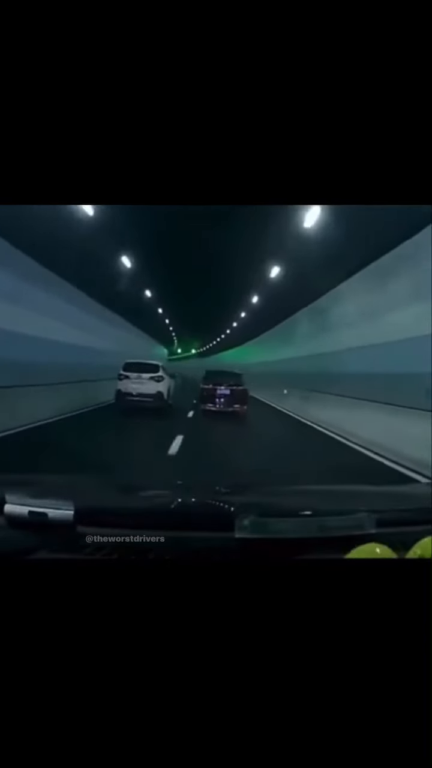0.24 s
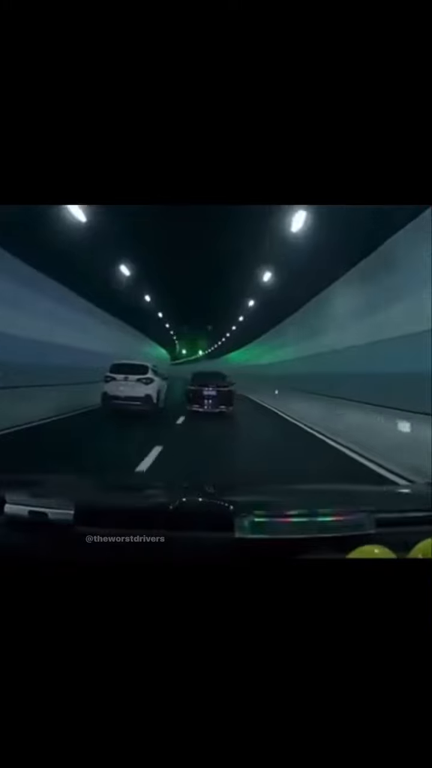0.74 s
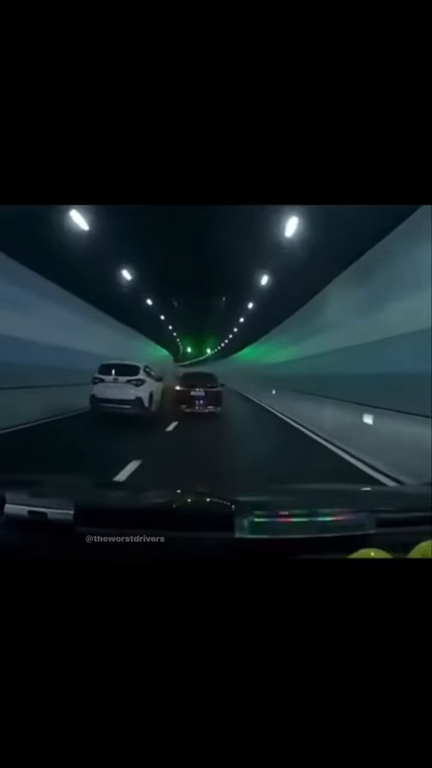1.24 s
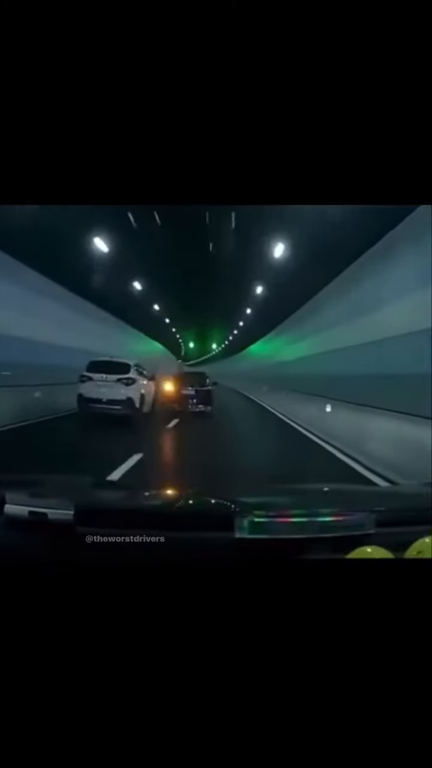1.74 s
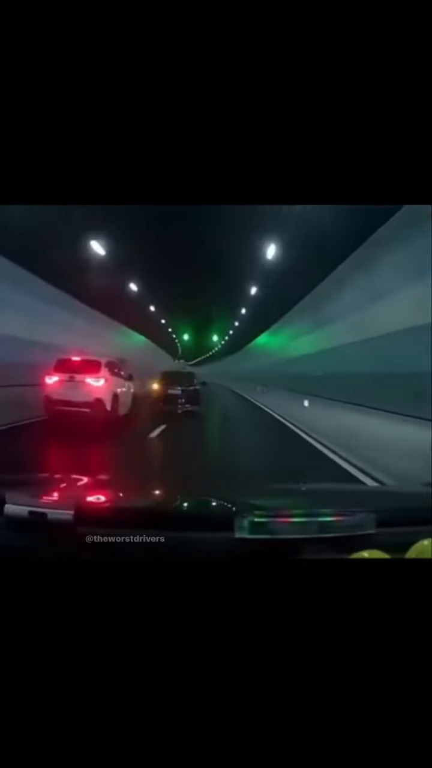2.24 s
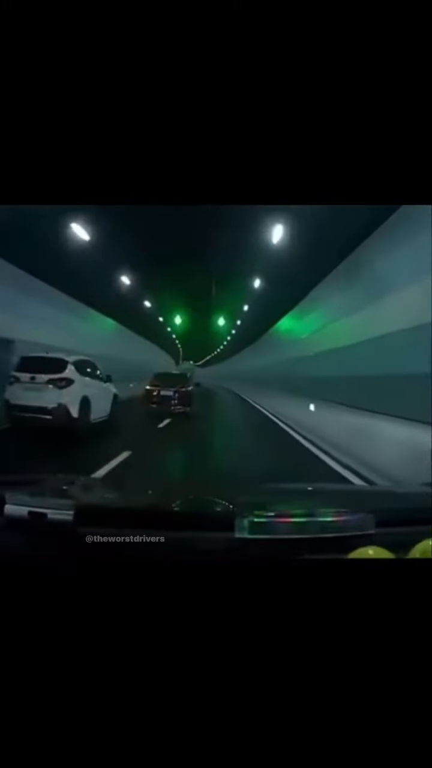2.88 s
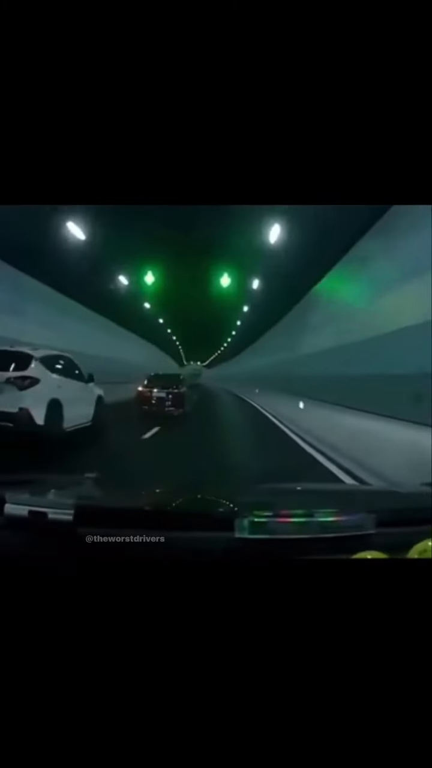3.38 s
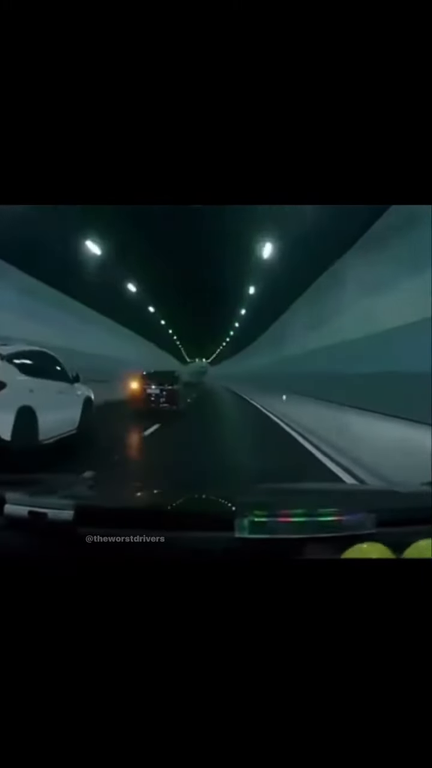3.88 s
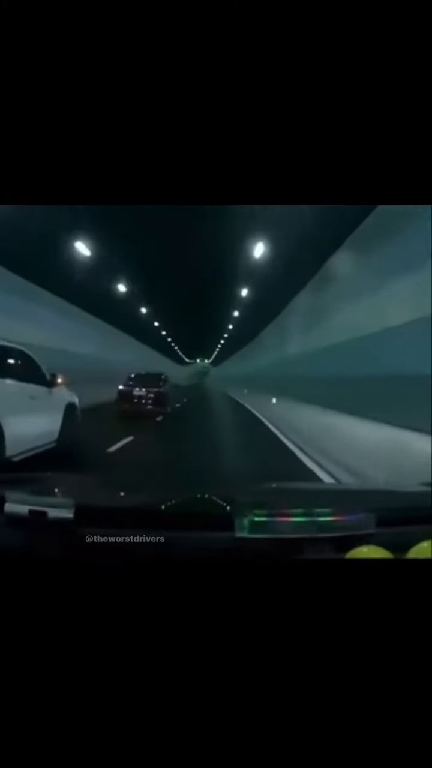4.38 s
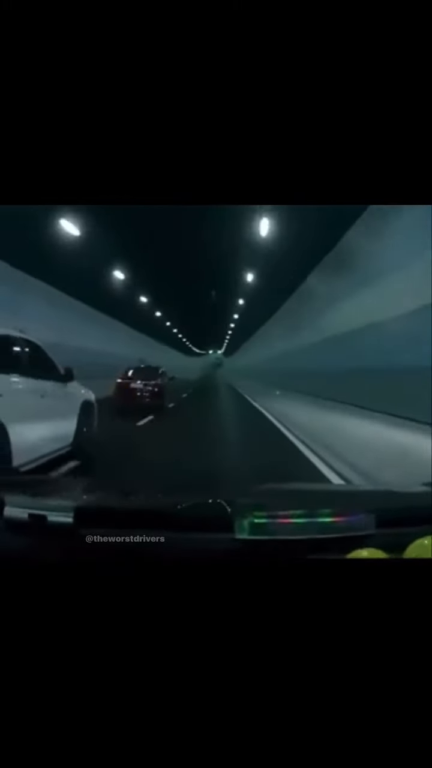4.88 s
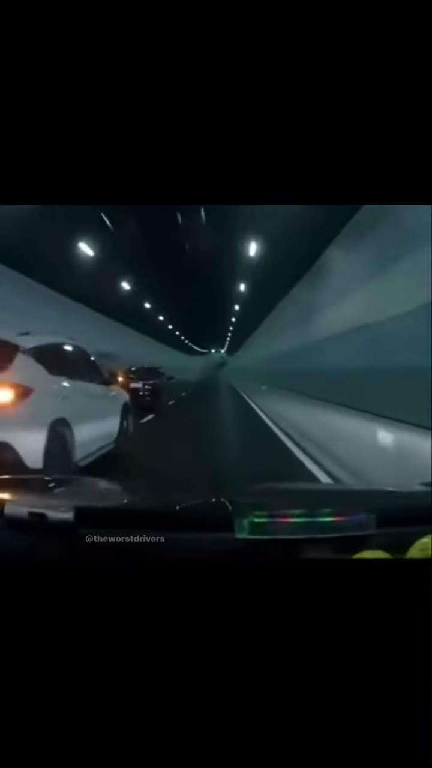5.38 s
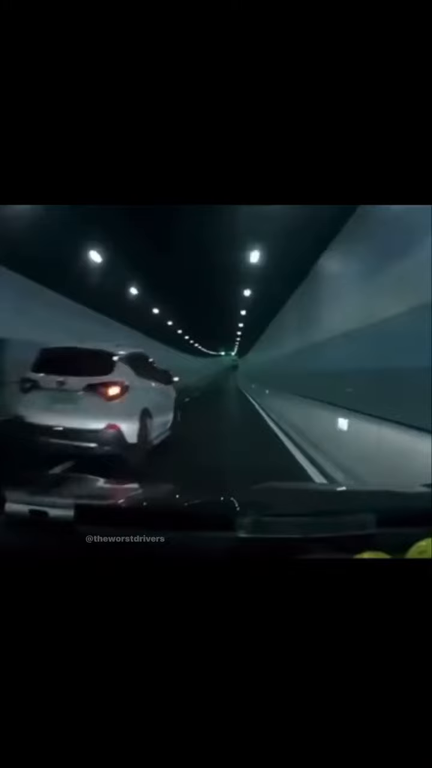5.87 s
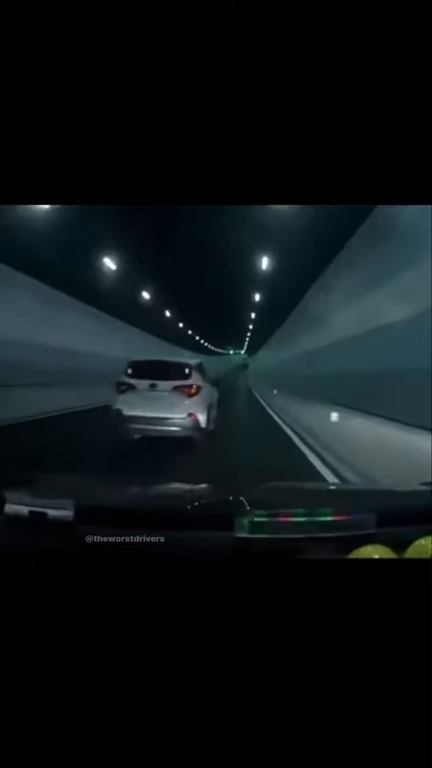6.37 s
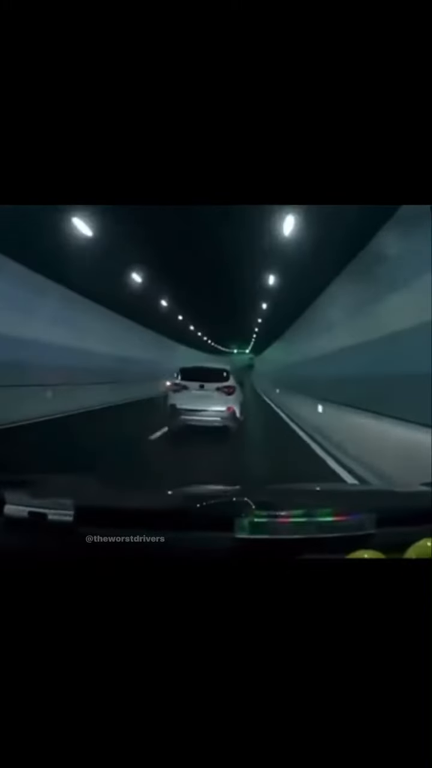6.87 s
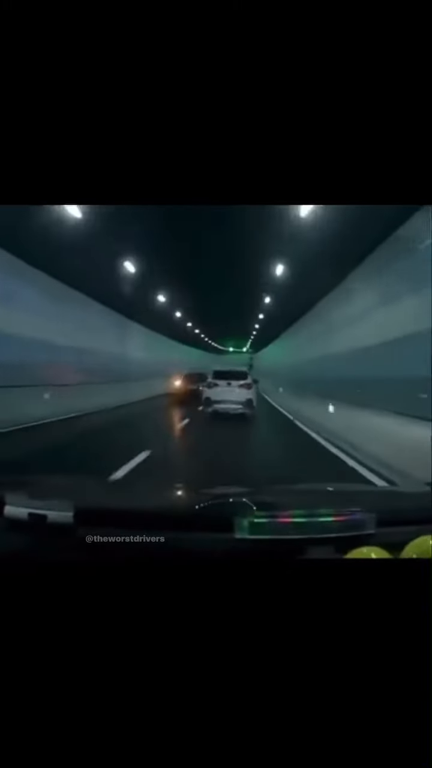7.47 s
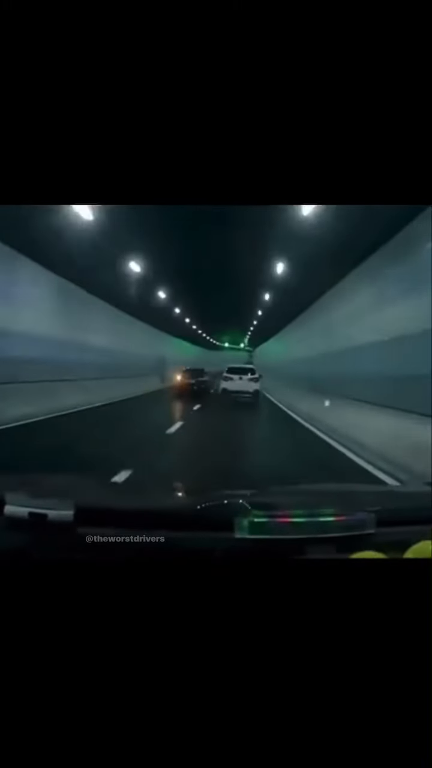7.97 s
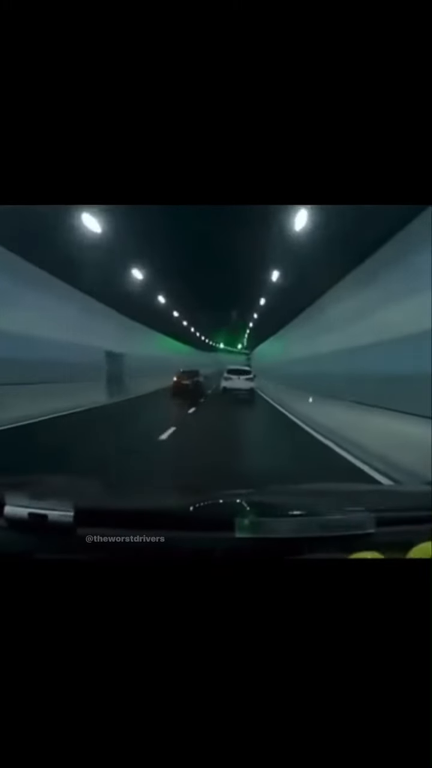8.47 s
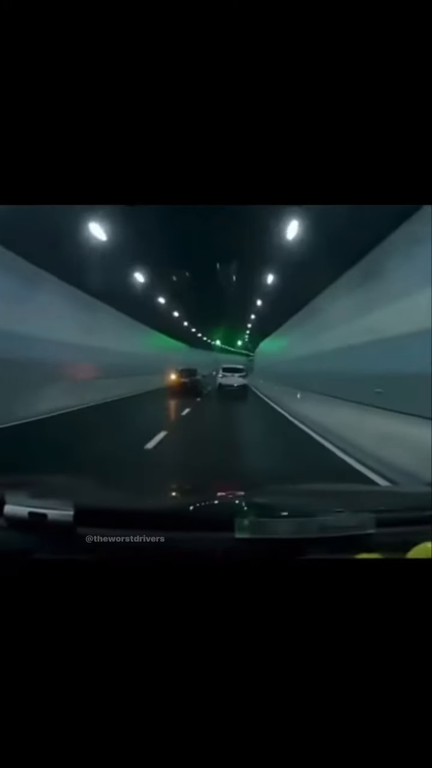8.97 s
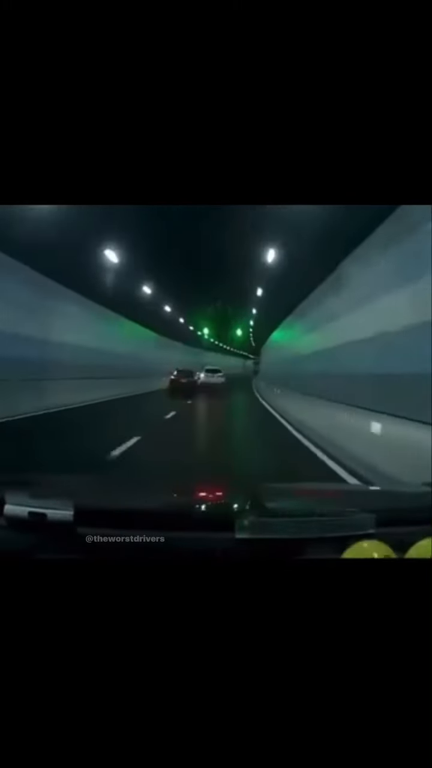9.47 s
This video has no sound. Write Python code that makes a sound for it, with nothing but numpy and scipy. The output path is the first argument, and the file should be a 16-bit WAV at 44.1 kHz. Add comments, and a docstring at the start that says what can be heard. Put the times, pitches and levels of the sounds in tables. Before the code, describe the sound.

Low, booming car cabin drone with faint air hiss, sharp plastic snap, bursts of dashboard rattling, a road-joint thump, then a momentary silence and click.

```python
"""Car cabin in a road tunnel

Heard from a camera on the windscreen: the body booms on its springs (narrow bands of low noise), the floor
drones, tyres roar through it and air hisses past the glass (flickering coloured noise). Something loose
rattles on the dashboard, plastic snaps, a metal part clinks and wheels cross road joints (struck modes).
A thin whistle (a wavering sine) sounds faintly and later climbs; near the end the sound drops out
for a moment and jumps back with a click."""
import sys
import numpy as np
from scipy import signal
from scipy.fft import rfft, irfft, next_fast_len
from scipy.io import wavfile
from scipy.ndimage import uniform_filter1d

SR = 44100
rng = np.random.default_rng(int(sys.argv[2]) if len(sys.argv) > 2 else 0)


def gain_from_decibels(decibels):
    """Convert decibel values to linear amplitude factors."""
    exponent = np.asarray(decibels, float) / 20
    return 10 ** exponent


def persist_wave(psi):
    """Save psi, clipped to +-1, as 16-bit WAV."""
    counts = np.round(np.clip(psi, -1, 1) * 32767).astype(np.int16)
    wavfile.write(sys.argv[1], SR, np.atleast_2d(counts).T)


N = 429093
T = np.arange(N) / SR

# Modes of the loose thing on the dashboard. Each row: pitch in Hz, relative level in dB,
# time in seconds for a knock's ring to fall 60 dB (the chatter rings shorter).
TRINKET_MODES = [(2070, 0, 0.015), (2520, -4, 0.028), (2900, -9, 0.0043), (3440, -0.5, 0.011),
                 (4240, 3, 0.0077), (4790, 5.5, 0.0097), (5390, 3.5, 0.013), (5860, 4.5, 0.011),
                 (6400, 2.5, 0.0088), (7000, -6.5, 0.0054), (7700, -10.5, 0.0025), (9050, -18.5, 0.0033),
                 (10300, -13, 0.004), (11700, -6.5, 0.004)]


def level(x, db):
    """Scale to an rms level."""
    return x * gain_from_decibels(db) / np.sqrt(np.mean(x ** 2))


def walk(rate):
    """Random levels held 1 / rate s and smoothed twice; spread near 1."""
    hold = int(SR / rate)
    steps = np.repeat(rng.standard_normal(N // hold + 1), hold)
    return 1.68 * uniform_filter1d(uniform_filter1d(steps, hold), hold)[:N]


def spell(start, length, edge):
    """Swell from 0 towards 1 and die away, half-way up at start and end; short spells stay below 1."""
    inside = np.minimum(T - start, start + length - T) / edge
    return np.sin(np.pi / 4 * (1 + np.clip(inside, -1, 1))) ** 2


def band_filter(x, order, edges):
    """Butterworth band-pass between two edges in Hz."""
    return signal.sosfilt(signal.butter(order, edges, "band", fs=SR, output="sos"), x)


def add(out, start, sound):
    """Mix a sound in at a time in seconds."""
    i = int(start * SR)
    out[i:i + len(sound)] += sound[:N - i]


def stream(colour, flicker_db, flicker_rate, shared_db):
    """Noise of a colour in overlapping octave bands; all waver together and each flickers alone; rms 1."""
    size = next_fast_len(N)
    octave = np.log2(np.arange(size // 2 + 1) * SR / size + 1)
    hz, db = np.transpose(colour)
    spectrum = rfft(rng.standard_normal(size)) * gain_from_decibels(np.interp(octave, np.log2(hz), db))
    shared = shared_db * walk(flicker_rate)
    out = 0
    for centre in np.arange(np.floor(np.log2(hz[0])), np.log2(hz[-1]) + 1):
        band = irfft(spectrum * np.clip(1 - abs(octave - centre), 0, 1), size)[:N]
        out = out + band * gain_from_decibels(shared + flicker_db * walk(flicker_rate))
    return level(out, 0)


def strike(modes, tilt_db, length, scatter_db, detune, push=0, soft_s=0.00051):
    """One blow: a sudden, dying burst of tiny contacts rings every mode with a new strength; peak 1."""
    hz, db, t60 = np.array(modes, float).T[:, :, None]
    t = T[:int(min(2 * t60.max() + .05, .25) * SR)]
    chance = rng.standard_normal((3, len(hz), 1))
    ring = gain_from_decibels(db + tilt_db + scatter_db * chance[0] - 60 * t / t60)
    ring = ring * (1 - np.exp(-t / soft_s)) ** 2  # the contact is soft, so the ring takes a moment to build
    ring = np.sum(ring * np.sin(2 * np.pi * hz * (1 + detune * chance[1]) * t), axis=0)
    age = T[:2048] / length
    contacts = (push + rng.standard_normal(2048)) * (1 - np.exp(-age / 0.08)) * np.exp(-age)
    out = signal.fftconvolve(ring, contacts)[:len(t)]
    return out / np.max(abs(out))


def boom():
    """Road unevenness shakes the low resonances of body and cabin; rms 1."""
    # Each row: resonance centre in Hz, width in Hz, relative level in dB.
    resonances = [(15.1, 12, -5.5), (24.97, 8, 5), (42.4, 25, -2.5)]
    out = 0
    for hz, width, db in resonances:
        band = band_filter(rng.standard_normal(N), 2, [hz - width / 2, hz + width / 2])
        out = out + level(band, db)
    # the springs bound the swing: big surges are held back, lulls filled in
    swing = np.sqrt(uniform_filter1d(out ** 2, int(.12 * SR)) + 1e-12)
    return level(out / swing ** .6, 0)


def drone():
    """The floor drones: low noise that wavers slowly."""
    # Each row: pitch in Hz, relative level in dB per Hz.
    colour = [(35, -33.5), (60, -1), (81, -10), (97, -3), (113, -1.5), (129, -0.5), (168, -9.5),
              (220, -9.5), (290, -35.5), (480, -120)]
    return stream(colour, flicker_db=0.21, flicker_rate=3.1, shared_db=0.74)


def roar():
    """Tyres roar through the floor: flickering noise, mostly low mids."""
    # Each row: pitch in Hz, relative level in dB per Hz.
    colour = [(120, -29), (200, -9.5), (241, -6), (294, -0.5), (379, -7), (463, -6.5), (624, -11),
              (1110, -16), (1210, -18), (1430, -20.5), (2800, -35.5), (3640, -59), (6160, -120)]
    return stream(colour, flicker_db=0.66, flicker_rate=12, shared_db=0.58)


def hiss():
    """Air hisses past the glass: quickly flickering treble noise."""
    # Each row: pitch in Hz, relative level in dB per Hz.
    colour = [(1530, -19.5), (2600, -3), (3620, 0.5), (4070, 2), (5030, 0.5), (7410, -14), (7870, -24.5),
              (8030, -33.5), (8760, -28.5), (11400, -73), (19300, -120)]
    return stream(colour, flicker_db=0.87, flicker_rate=18, shared_db=0.86)


def ride():
    # Each row: time in seconds, level in dB against the steady run.
    recording_level = [(0.0, -6), (.5, -5.5), (1.3, -3), (2.2, -2), (2.9, 0), (3.6, 0), (4.3, 0.5),
                       (5.3, 0), (6.3, 0), (7.6, 0.5), (9.0, 0), (9.73, 0)]
    # Uneven stretches heave the body. Each row: start in seconds, length in seconds,
    # added boom in dB, added floor drone in dB (both for a full swell).
    heaves = [(3.087, 0.12, -22, -39), (3.344, 0.04, -17.5, -35), (3.638, 0.38, -19, -41.5),
              (3.685, 0.036, -34, -34.5), (3.82, 0.19, -23, -33), (4.486, 0.073, -18, -40.5),
              (4.603, 0.033, -23, -31), (4.773, 0.027, -16.5, -31.5), (4.965, 0.14, -23, -38),
              (5.752, 0.029, -19, -52), (6.394, 0.08, -18, -38), (6.528, 0.24, -24, -46),
              (7.228, 0.32, -19.5, -41), (7.8, 0.35, -20.5, -34.5), (9.303, 0.055, -45, -44)]
    ramp_db = np.interp(T, *np.transpose(recording_level))
    heave_power, shudder_power = 0, 0
    for start, length, boom_db, drone_db in heaves:
        shape = spell(start, length, edge=0.043) ** 2
        heave_power = heave_power + gain_from_decibels(2 * boom_db) * shape
        shudder_power = shudder_power + gain_from_decibels(2 * drone_db) * shape

    def gain(steady_db, added_power):
        """Levels join as powers."""
        return np.sqrt(gain_from_decibels(2 * steady_db) + added_power)

    # the shudder reaches roar and hiss weaker than the drone
    roar_power, hiss_power = shudder_power * gain_from_decibels(2 * -2.5), shudder_power * gain_from_decibels(2 * -20.5)
    out = gain(-27.5 + ramp_db, heave_power) * boom()
    out = out + gain(-33 + ramp_db, shudder_power) * drone()
    out = out + gain(-35 + ramp_db, roar_power) * roar()
    return out + gain(-55.5 + 1.18 * ramp_db, hiss_power) * hiss()  # the ramp is steeper in the hiss


def joints():
    """Wheels hit joints in the road and the floor pan rings."""
    # Each row: time in seconds (the blow begins 3 ms earlier), peak in dB.
    blows = [(7.821, -14), (7.847, -12.5), (7.867, -18), (7.929, -18.5)]
    # Each row: mode pitch in Hz, relative level in dB, time to fall 60 dB in seconds.
    floor_pan = [(114, -33, 0.068), (178, 6.5, 0.07), (246, 8, 0.12), (306, -24, 0.045), (537, 0, 0.068),
                 (1024, -4, 0.021)]
    out = np.zeros(N)
    for s, db in blows:
        add(out, s - .003, gain_from_decibels(db) * strike(floor_pan, 0, 0.001, 1.7, 0.055, push=2.2))
    return out


def rattle():
    """Something loose knocks on the dashboard: ringing modes, a scrape while contacts last, a faint crack."""
    # Each row: time in seconds, peak of the ring in dB, brightest pitch in Hz,
    # contact length in seconds, boost of the hollow body's modes in dB.
    hits = [(0.3485, -41, 5600, 0.0018, 8), (0.4464, -43.5, 5200, 0.001, 13),
            (0.6759, -38.5, 5170, 0.0018, 14), (0.7162, -38.5, 5800, 0.0033, 11),
            (1.101, -42, 4600, 0.0046, 6), (3.7973, -38.5, 4540, 0.0044, 11), (4.255, -38, 4520, 0.0046, 2),
            (4.44, -35, 3900, 0.0037, 9), (4.606, -37, 5700, 0.0034, 10), (4.628, -27, 4970, 0.0058, -4),
            (4.645, -35, 4800, 0.0046, 0), (4.6885, -32, 5200, 0.0056, 3), (4.735, -41, 5070, 0.0028, 3),
            (4.867, -25, 5200, 0.0011, 8), (4.78, -41, 4800, 0.004, 9), (5.017, -35, 4420, 0.0059, -1),
            (5.267, -36.5, 4750, 0.0043, 4), (5.32, -40, 5720, 0.0045, -1), (5.345, -33, 6400, 0.0047, 5),
            (5.394, -33.5, 4800, 0.004, -2), (5.423, -36, 4280, 0.0045, 1.5), (5.47, -36, 4810, 0.004, 1.5),
            (5.508, -28, 6100, 0.0056, -2), (5.518, -37, 6200, 0.003, -2), (5.5535, -34, 5600, 0.0075, -4),
            (5.592, -28, 6000, 0.004, -3), (5.65, -35, 4900, 0.0054, 6), (5.673, -36, 5200, 0.0084, -2),
            (5.682, -25.5, 5400, 0.0093, -3), (5.731, -40, 4900, 0.005, -1),
            (5.753, -32.5, 4800, 0.0037, -3), (5.834, -32.5, 5000, 0.003, 4), (5.854, -31, 5900, 0.003, -1),
            (5.9105, -28.5, 5900, 0.0022, 0), (5.919, -33, 5000, 0.011, -2), (5.935, -37, 4900, 0.002, 7),
            (5.957, -33, 5060, 0.003, -1), (5.996, -34.5, 5860, 0.0025, -3), (6, -39, 5600, 0.0036, 7),
            (6.07, -40, 4260, 0.004, 5), (7.2958, -40, 6580, 0.0036, 3), (7.338, -33.5, 5800, 0.005, -3),
            (7.361, -33.5, 3830, 0.0046, 3), (7.384, -36, 5770, 0.0046, -3), (7.4, -30, 5200, 0.0047, 1),
            (7.419, -33, 5200, 0.0068, 5), (7.428, -30, 5170, 0.0092, 0), (7.475, -31.5, 6000, 0.0051, -2),
            (7.516, -34.5, 4450, 0.0044, -1), (7.554, -34, 3920, 0.003, 4), (7.559, -35, 6050, 0.0051, 5),
            (7.59, -37, 5610, 0.0037, -1), (7.61, -41, 5200, 0.003, 0), (7.633, -37, 6080, 0.0025, 1.5),
            (7.846, -37.5, 4990, 0.0023, 14), (8.079, -40.5, 3120, 0.0041, 3)]
    out = np.zeros(N)
    mode_hz = np.array(TRINKET_MODES)[:, :1]
    early_s = .0005  # ring and scrape begin this far ahead of the crack
    for s, db, bright_hz, length, body_db in hits:
        # where it lands decides which modes are favoured; those below 3600 Hz belong to the hollow body
        tilt_db = -9 * abs(np.log2(mode_hz / bright_hz)) + body_db * (mode_hz < 3600)
        add(out, s - early_s, gain_from_decibels(db) * strike(TRINKET_MODES, tilt_db, length, 1.5, .03, soft_s=.0002))
        scrape = band_filter(rng.standard_normal(1024), 2, [bright_hz / 1.3, bright_hz * 1.3])
        scrape = scrape * np.exp(-T[:1024] / length) * (1 - np.exp(-T[:1024] / .0005))
        add(out, s - early_s, gain_from_decibels(db - 4) * scrape)
        crack = rng.standard_normal(512) * np.exp(-T[:512] / 0.0009)
        add(out, s, gain_from_decibels(db - 21) * crack)
    return out


def chatter():
    """In spells the loose thing shuffles: dense tiny contacts of uneven size on its modes."""
    # Each row: start in seconds, length in seconds, level in dB.
    spells = [(3.75, 0.73, -62), (4.538, 0.28, -54), (5.284, 0.77, -52), (5.997, 0.64, -63),
              (7.294, 0.3, -50), (7.798, 0.44, -65)]
    contacts = rng.standard_normal(N) * gain_from_decibels(3 * walk(300) + .6 * walk(45))
    t = T[:256]
    ring = 0
    for hz, db, t60 in TRINKET_MODES:
        ring = ring + gain_from_decibels(db - 60 * t / (0.34 * t60)) * np.sin(2 * np.pi * hz * t)
    shuffle = signal.fftconvolve(contacts, ring)[:N]
    shuffle = signal.sosfilt(signal.butter(4, 7800, fs=SR, output="sos"), shuffle)
    shaking = sum(gain_from_decibels(db) * spell(start, length, edge=.15) for start, length, db in spells)
    return shaking * level(shuffle, 0)


def snaps():
    """Plastic snaps: a crackle of noise, and a panel that is struck and then bounces."""
    # Each row: time in seconds, peak of the first strike in dB, brightest pitch in Hz.
    hits = [(3.9734, -19, 3865), (5.9376, -29, 2090), (7.2463, -33.5, 2800)]
    # Each row: mode pitch in Hz, relative level in dB, time to fall 60 dB in seconds.
    panel = [(620, -3, .014), (974, 1, .014), (1249, 0, .013), (1630, 0, .014), (2080, 0, .016),
             (2450, 0, .013), (2800, -2, .016), (3300, -1, .016), (3580, -2, .015), (3860, 5.5, .015),
             (4100, -3, .012), (4460, -1, .02)]
    # The landing, then its bounces. Each row: delay in seconds, level in dB against the landing.
    bounces = [(0, 0), (.00155, -8), (.0049, -12)]
    out = np.zeros(N)
    for s, db, bright_hz in hits:
        crackle = rng.standard_normal(1024) * np.exp(-T[:1024] / .0035)
        add(out, s, gain_from_decibels(db - 6) * band_filter(crackle, 7, (700, 4400)))
        tilt_db = -3 * abs(np.log2(np.array(panel)[:, :1] / bright_hz))
        for late, weaker_db in bounces:
            blow = strike(panel, tilt_db, .0001, 1.5, .004, push=4, soft_s=.0002)
            add(out, s + late, gain_from_decibels(db + weaker_db) * blow)
    return out


def clink():
    """A small metal part clinks once, ringing a few modes."""
    # Each row: mode pitch in Hz, relative level in dB, time to fall 60 dB in seconds.
    clasp = [(1900, -9, .02), (2030, -5.5, .028), (3580, 0, .036), (5800, -7, .012)]
    out = np.zeros(N)
    add(out, 1.838, gain_from_decibels(-33) * strike(clasp, 0, .0001, .5, .002, push=6))
    return out


def whistle():
    """A thin, unsteady tone: faint and level at first, later swelling and fading as it climbs."""
    # The first, level whistle: start in seconds, length in seconds, level in dB.
    early = (1.96, .37, -72)
    # The climbing whistle swells and fades. Each row: time in seconds, level in dB.
    swells = [(6.05, -85), (6.1, -61), (6.15, -59), (6.31, -62), (6.34, -70), (6.47, -69), (6.51, -59),
              (6.6, -61), (6.68, -65), (6.72, -74), (6.79, -73), (6.83, -67), (6.86, -73), (6.92, -64),
              (6.98, -72), (7.07, -70), (7.13, -75), (7.2, -71), (7.25, -85)]
    climb_s, early_hz, climb_from_hz, climb_hz_per_s = 6.0, 6550, 5670, 410
    pitch = np.where(T < climb_s, early_hz, climb_from_hz + climb_hz_per_s * (T - climb_s))
    pitch = pitch * (1 + .003 * walk(70) + .002 * walk(15))
    start, length, db = early
    climbing = gain_from_decibels(np.interp(T, *np.transpose(swells), left=-200, right=-200))
    loudness = (gain_from_decibels(db) * spell(start, length, edge=.03) + climbing) * gain_from_decibels(1.8 * walk(50))
    return np.sqrt(2) * loudness * np.sin(2 * np.pi * np.cumsum(pitch) / SR)


def scene():
    """All sources meet in the middle; patchy treble is heard at the sides, weaker for knocks."""
    steady = ride() + chatter() + whistle()
    hits = rattle() + snaps() + clink() + joints()
    mid = steady + hits
    patchy = (steady + gain_from_decibels(-8) * hits) * walk(120)
    side = signal.sosfilt(signal.ellip(10, .5, 70, 4200, "high", fs=SR, output="sos"), patchy)
    side = signal.sosfilt(signal.butter(4, 3500, "high", fs=SR, output="sos"), side)
    side = gain_from_decibels(-7.5 + 3 * walk(20)) * side
    return np.array([mid + side, mid - side])


def top_cut(x):
    """Nothing passes above the cut-off."""
    return signal.sosfilt(signal.butter(12, 13000, fs=SR, output="sos"), x)


def record(dry):
    """The camera cuts the top and adds faint, flickering noise; once all dies away and clicks back."""
    fade_s, fade_length_s, back_s = 9.04, .032, 9.1368
    fade = np.clip((T - fade_s) / fade_length_s, 0, 1)
    gap = np.where(T < back_s, abs(np.cos(np.pi / 2 * fade)) ** 3.9, 1)
    click = -gain_from_decibels(-21) * (T >= back_s) * np.exp(-abs(T - back_s) / 0.00075)
    click = uniform_filter1d(click, size=5)
    heard = dry * gap
    mix = signal.sosfilt(signal.butter(12, 8400, fs=SR, output="sos"), heard + click)
    mix = mix + gain_from_decibels(-33.5) * heard  # a trace of the top leaks by
    mix = mix + gap * gain_from_decibels(-88.0 + 4.8 * walk(24)) * rng.standard_normal(mix.shape)
    return top_cut(mix)


dry = scene()
out = record(dry)
persist_wave(out)
```